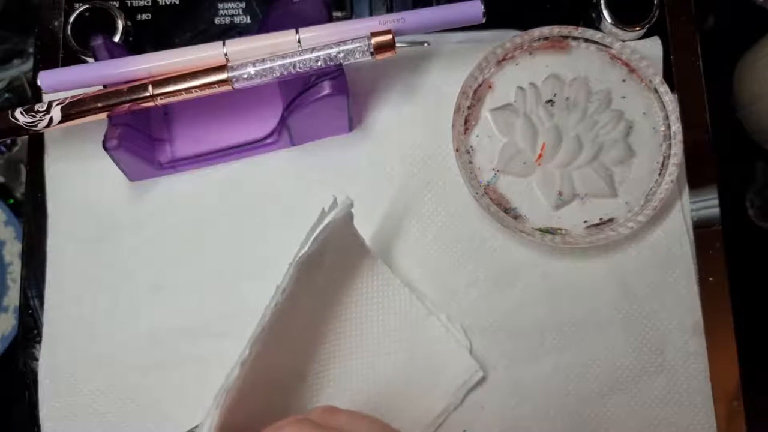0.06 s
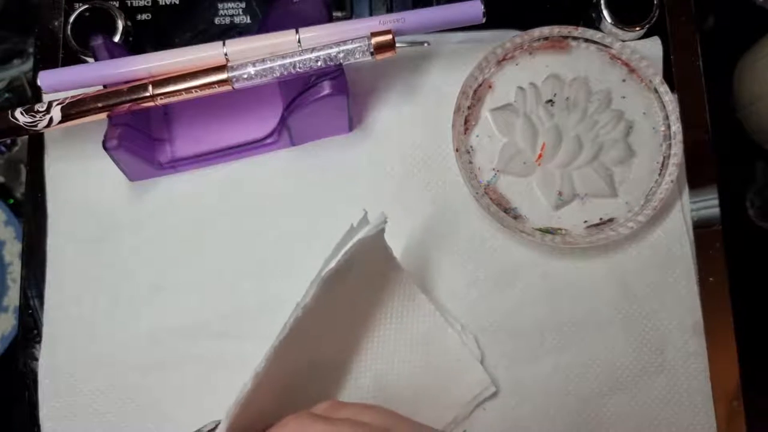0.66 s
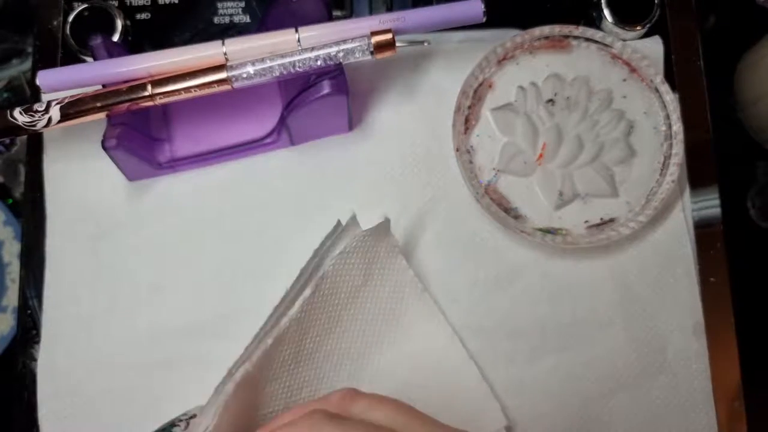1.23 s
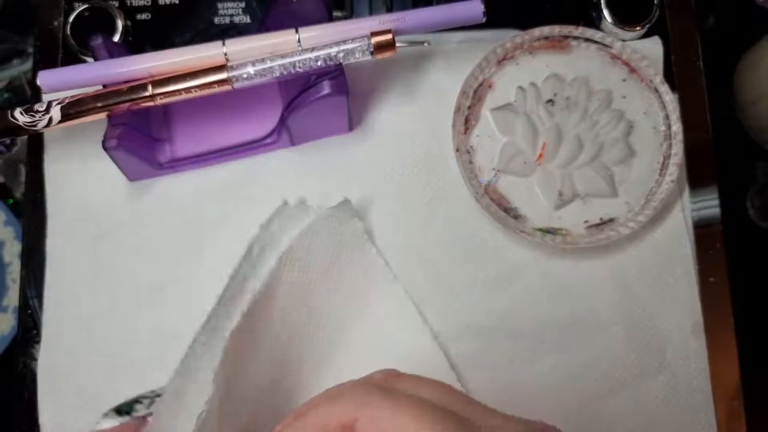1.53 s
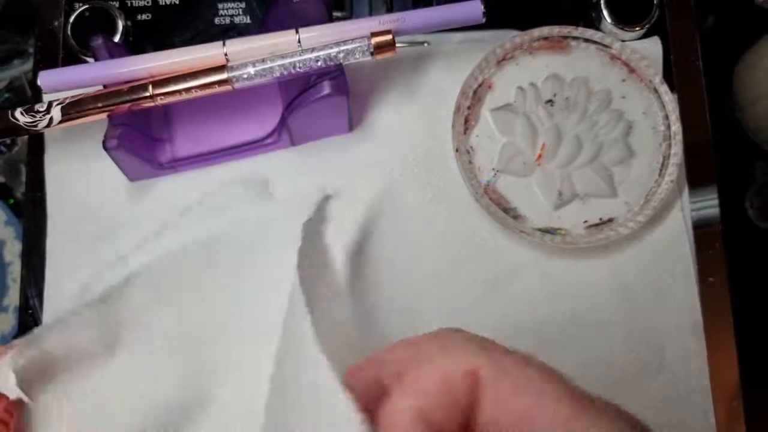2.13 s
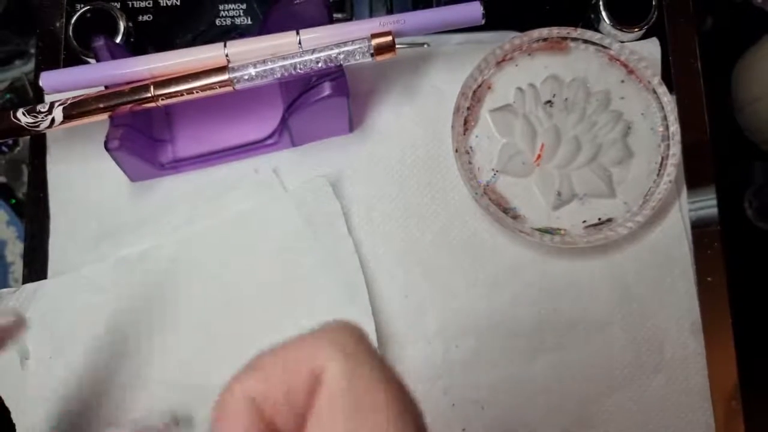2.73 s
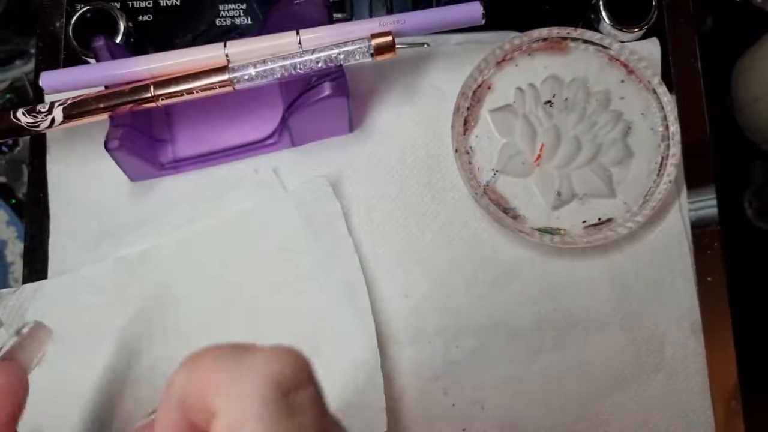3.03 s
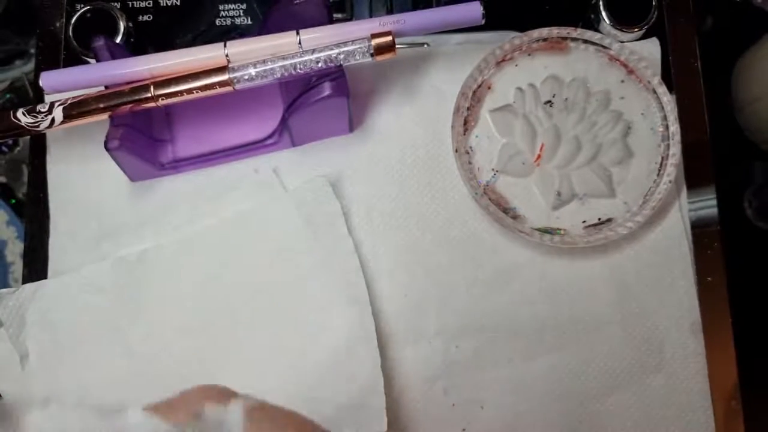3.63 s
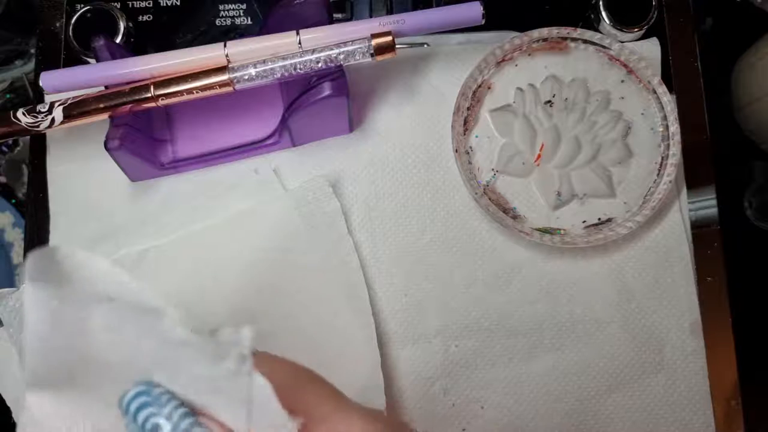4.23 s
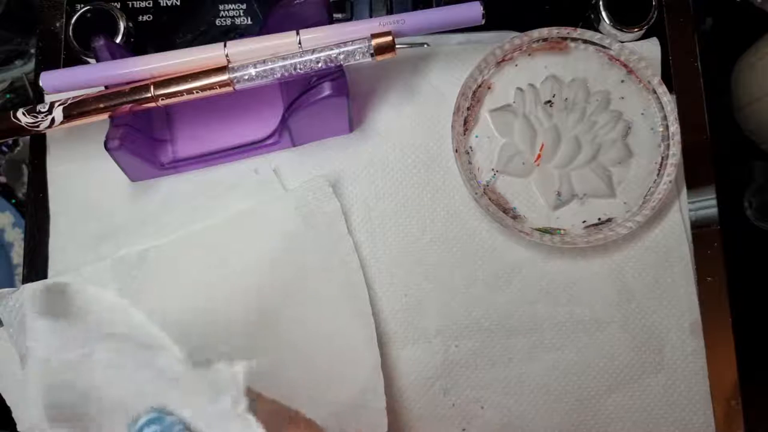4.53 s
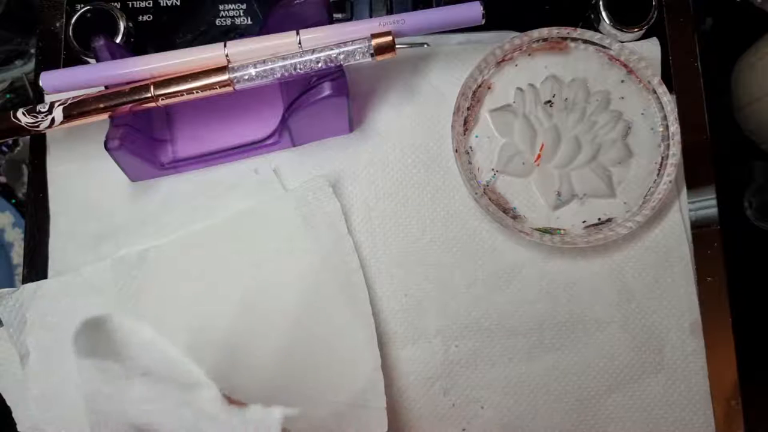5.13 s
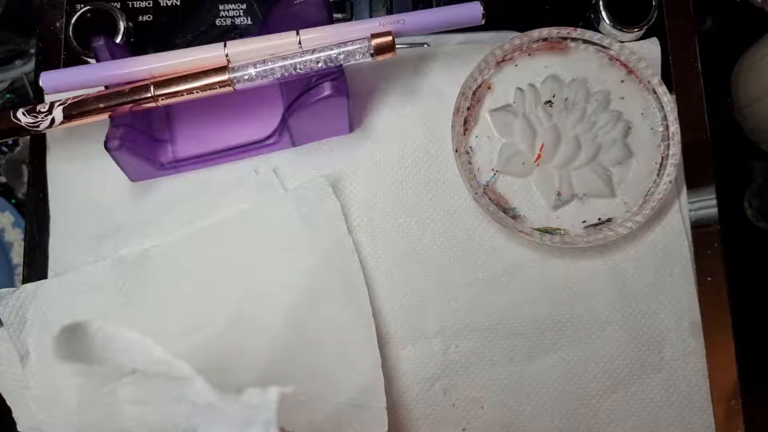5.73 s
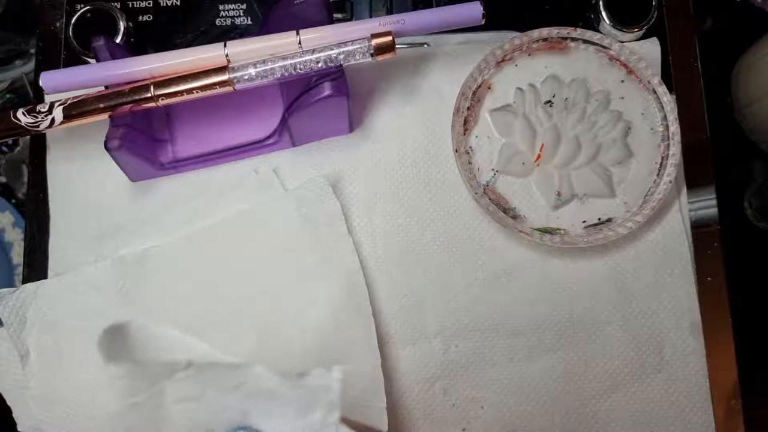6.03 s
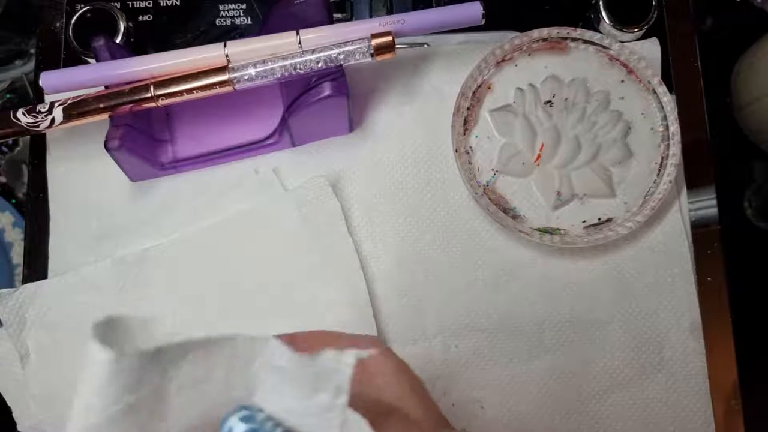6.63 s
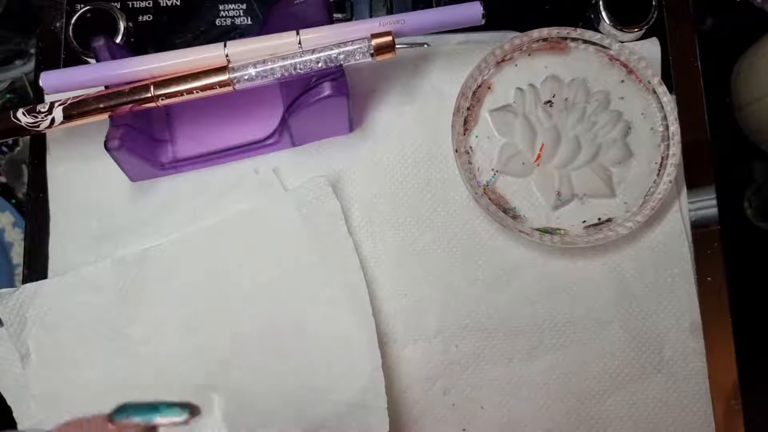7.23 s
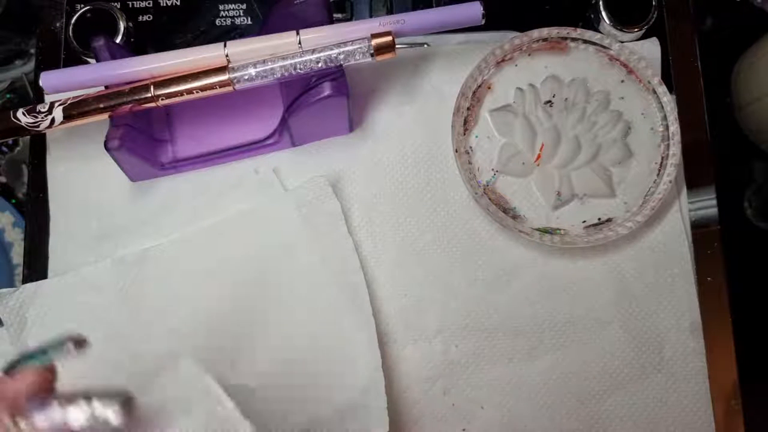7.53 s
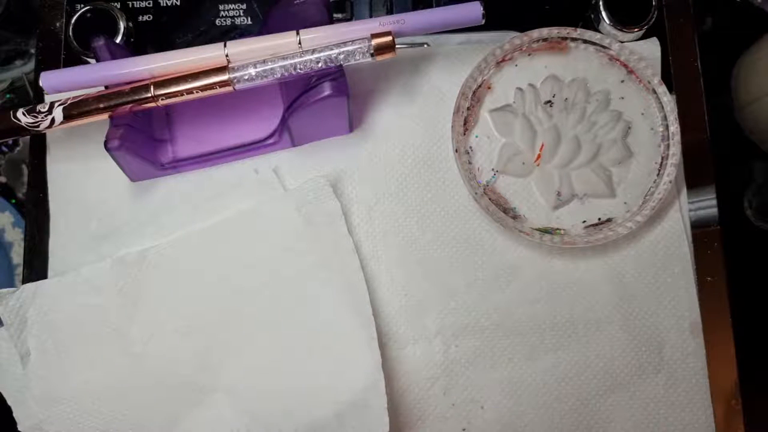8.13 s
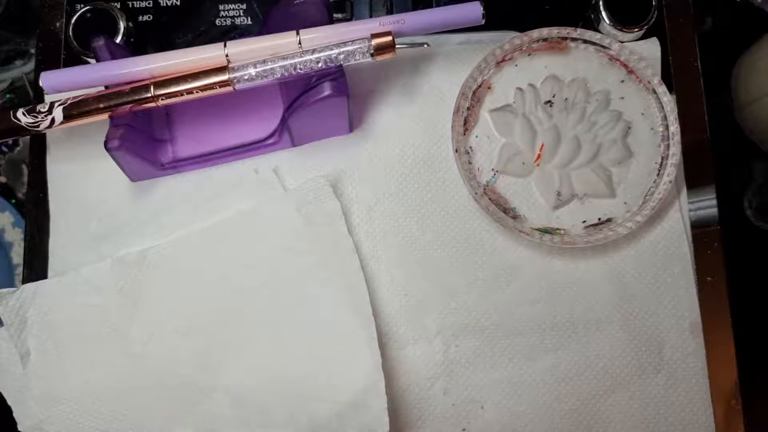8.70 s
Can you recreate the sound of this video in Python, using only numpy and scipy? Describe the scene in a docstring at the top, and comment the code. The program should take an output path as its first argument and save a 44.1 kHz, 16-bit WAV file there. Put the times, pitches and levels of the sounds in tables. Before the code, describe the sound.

Paper tissues are pulled apart and handled on a desk, with soft hissing rustles and small crease snaps. A pump bottle scrapes briefly as it is lifted, then squirts four times in quick succession with pops, hisses and sharp plastic clicks, the last one weak. It lands with a ringing thud, and the tissue is rubbed in short strokes. Everything is close, in a small quiet room with a faint fan.

```python
"""In a small quiet room with a distant fan, paper tissues are pulled apart and handled on a desk:
their fibres hiss, creases snap and hands rub dully. At 4 s a pump bottle scrapes off the desk.
From 5 s it squirts four times into the tissue, with a popping valve, hissing mist and clicking plunger.
At 6.4 s it is set down with a thud that makes desk and bottle ring.
Then the tissue is rubbed in short strokes."""
import sys
import numpy as np
from scipy import signal
from scipy.fft import rfft, irfft, next_fast_len
from scipy.io import wavfile

SR = 44100
rng = np.random.default_rng(int(sys.argv[2]) if len(sys.argv) > 2 else 0)


def inscribe(sig):
    """Save sig as 16-bit PCM at rate SR to the path in sys.argv[1].

    A 1-D sig is mono; a 2-D sig holds one channel per row.
    Samples are clipped to [-1, 1] before scaling.
    """
    pcm = np.round(np.clip(np.atleast_2d(sig).T, -1, 1) * 32767)
    wavfile.write(sys.argv[1], SR, pcm.astype(np.int16))


N = 390726
TIME = np.arange(N) / SR
SIDES = np.array([[.5], [-.5]])  # half of a left-right difference goes to each side

# pushes of the pump: (time [s], length [s], mist level [dB], valve pop level [dB], valve pitch [Hz])
SQUIRTS = [(5.118, 0.062, -36, -21, 1700), (5.3931, 0.047, -34.5, -8.5, 1630),
           (5.6491, 0.033, -33, -7.5, 1554), (5.9008, 0.0039, -34, -57, 1600)]


def amp(db):
    """Turns decibels into a number to multiply by."""
    return 10 ** (np.asarray(db) / 20)


def unit(x):
    """Scales a signal to an average (rms) strength of 1."""
    return x / np.sqrt(np.mean(x ** 2) + 1e-30)


def curve_at(points, hz):
    """Looks up a value between (frequency, value) points, on a scale of octaves."""
    f, value = np.transpose(points)
    return np.interp(np.log(hz + 1), np.log(f + 1), value)


def add(mix, s, sound):
    """Mixes a sound in, starting at s seconds."""
    part = mix[:, round(s * SR):][:, :sound.shape[-1]]
    part += sound[..., :part.shape[1]]


def colour(x, db_at, size=4096):
    """Turns each frequency up or down by db_at(frequency); nothing sounds ahead of its cause."""
    log_gain = np.log(amp(db_at(abs(np.fft.fftfreq(size, 1 / SR)))))
    response = np.exp(np.conj(signal.hilbert(log_gain)))
    taps = np.fft.ifft(response).real[:size // 2]
    return signal.oaconvolve(x, taps[None], axes=1)[:, :x.shape[1]]


def stereo(x, lag_samples=10):
    """Makes two unrelated signals left and right: alike in the bass, apart in the treble, right later."""
    # how alike the two sides are: (frequency [Hz], likeness [0 to 1])
    likeness = [(30, .85), (150, 0.76), (400, 0.64), (800, 0.1), (1500, 0.28), (16000, 0.034)]
    size = next_fast_len(x.shape[1], True)
    left, other = rfft(x, size)
    same = np.clip(curve_at(likeness, np.fft.rfftfreq(size, 1 / SR)), -1, 1)
    right = irfft(same * left + np.sqrt(1 - same ** 2) * other, size)[:x.shape[1]]
    return np.array([x[0], np.roll(right, lag_samples)])


def shaped_noise(spectrum, samples, filter_size=4096):
    """Stereo noise of strength 1 with the given balance of low and high."""
    white = stereo(rng.standard_normal((2, samples)))
    return unit(colour(white, lambda f: curve_at(spectrum, f), filter_size))


def wander(per_s):
    """A random drift of strength 1 that takes a new direction per_s times a second."""
    turns = np.arange(0, N / SR + 1, 1 / per_s)
    return unit(np.interp(TIME, turns, rng.standard_normal(8192)[:len(turns)]))


def ring(hz, t60, t):
    """A dying tone; t60 is its ring time, the seconds it takes to fade by 60 dB."""
    return np.sin(2 * np.pi * hz * t) * np.exp(-np.log(1000) * t / t60)


def hump(f, hz, octaves):
    """A broad hill of loudness around the frequency hz, in dB."""
    return -12 * np.log2(1 + (np.log2((f + 20) / hz) / octaves) ** 2 / 2)


def crack(decay_s, scatter, size=3000):
    """A sharp pulse, later on the right, with a quick scatter of noise behind it."""
    x = scatter * rng.standard_normal((2, size)) * np.exp(-np.arange(size) / SR / decay_s)
    x[0, 0] += 1
    x[1, 12] += .6
    return x


def gesture(length, rise_s, release_s):
    """One movement of a hand: a smooth start, a hold, and a fade."""
    t = np.arange(0, length + 10 * release_s, 1 / SR)
    rise = np.sin(np.pi / 2 * np.minimum(t / rise_s, 1)) ** 2
    return rise * np.exp(-np.maximum(t - length, 0) / release_s)


def from_left(x):
    """The camera shades the right microphone from treble that comes from the left."""
    # the shading: (frequency [Hz], left louder than right [dB])
    shade = [(100, 1), (700, 1), (2500, 1), (6000, 3), (9000, 7.5), (14000, 5.5)]
    left = colour(x[:1], lambda f: curve_at(shade, f) / 2)
    right = colour(x[1:], lambda f: -curve_at(shade, f) / 2)
    return np.vstack([left, right])


def room(x, early_db, tail_db, early_s=0.0086, size=26000):
    """Adds quick echoes from the desk and its clutter, then the room's short tail."""
    # how long the room rings: (frequency [Hz], ring time [s])
    ring_times = [(100, 0.75), (300, 0.37), (1000, 0.29), (4000, 0.24), (9000, 0.14), (16000, 0.16)]
    bounces = rng.standard_normal((2, size)) * (rng.random((2, size)) < .15) * (np.arange(size) > 60)
    early = bounces * np.exp(-np.arange(size) / SR / early_s)
    hz, t, bands = signal.stft(stereo(bounces * rng.choice([-1, 1], size)), SR, nperseg=256)
    fade = np.exp(-np.log(1000) * t / curve_at(ring_times, hz)[:, None])
    tail = signal.istft(bands * fade, SR, nperseg=256)[1][:, :size]
    echo = (amp(early_db) * unit(early) + amp(tail_db) * unit(tail)) / np.sqrt(size)
    return x + signal.fftconvolve(x, echo, axes=1)[:, :N]


def room_tone(air_db=-63.5):
    """Steady low rumble and hiss with the faint wavering tones of a distant fan."""
    # the room's rumble and hiss: (frequency [Hz], relative level [dB])
    air_spectrum = [(15, -34.5), (25, -14), (40, -8), (57, -3), (108, -10), (130, -22.5), (190, -22.5),
                    (249, -33), (285, -27), (531, -28.5), (818, -42), (2350, -47), (3340, -47), (4140, -44),
                    (13600, -43.5), (16000, -49)]
    # the fan's tones: (pitch [Hz], level [dB])
    fan_tones = [(57, -76), (116, -78.5), (460, -88.5), (500, -86), (537, -88.5)]
    air = shaped_noise(air_spectrum, N, filter_size=16384)
    fan = sum(amp(db) * np.sqrt(2) * np.sin(2 * np.pi * hz * TIME + wander(4.8)) for hz, db in fan_tones)
    return air * amp(air_db) + fan


def desk_hums():
    """Low desk tones swell and fade, some as the boom around the bottle's lift and set-down."""
    # low desk tones: (time [s], length [s], level [dB], pitch [Hz])
    hums = [(3.795, 0.032, -47, 151), (4.054, 0.059, -32.5, 206), (4.07, 0.096, -43.5, 129),
            (6.075, 0.055, -54, 213), (6.518, 0.33, -57, 59.5), (6.65, 0.18, -55.5, 149.4)]
    out = np.zeros((2, N))
    for s, length, db, hz in hums:
        t = np.arange(0, length, 1 / SR)
        add(out, s, amp(db) * np.sin(np.pi * t / length) * np.sin(2 * np.pi * hz * t))
    return out


def hands(tissue_body, stroke_db=-9, lumpy_db=4.0, rise_s=0.058, release_s=0.07):
    """Dull, uneven rubbing of hands on the padded desk: a little with each stroke, more in a drag."""
    # the heel of a hand dragging: (time [s], length [s], level [dB])
    drags = [(1.44, 0.035, -65.5), (2.598, 0.038, -60.5), (2.69, 0.062, -63.5), (2.83, 0.053, -64),
             (3.58, 0.058, -56), (3.76, 0.063, -59.5), (3.988, 0.039, -60), (5.23, 0.037, -59),
             (6.04, 0.055, -64), (6.59, 0.22, -64), (6.938, 0.043, -62), (7.193, 0.16, -69)]
    # the dull rub: (frequency [Hz], relative level [dB])
    rub_spectrum = [(60, -28.5), (110, 6), (160, -7.5), (300, -1.5), (450, -3), (650, -17.5), (1000, -33.5)]
    pressure = tissue_body * amp(stroke_db)
    for s, length, db in drags:
        add(pressure, s, amp(db) * gesture(length, rise_s, release_s))
    return shaped_noise(rub_spectrum, N) * pressure * amp(lumpy_db * wander(50))


def sliding(rise_s=0.052, release_s=0.036, shift_body_db=-3.5, shift_fizz_db=-4, shift_left_db=0.3):
    """How loudly the tissue slides in its body (low), middle and fizz (high): strokes plus shifting."""
    # tissue sliding on tissue: (time [s], length [s], middle level [dB], body against middle [dB],
    # fizz against middle [dB], left louder than right [dB])
    strokes = [(0.343, 0.1, -77.5, -15, -4, 0), (0.597, 0.046, -70.5, -2, -2, -2),
               (0.675, 0.048, -78.5, 5, 3, -7), (0.984, 0.14, -75.5, -10, 0, 0),
               (1.137, 0.066, -71.5, -5, 3, 0), (1.226, 0.031, -68, -2.5, 4, -1),
               (1.324, 0.12, -68, -4.5, -2, -1), (1.606, 0.034, -66.5, -2, -2, 0),
               (1.843, 0.076, -58, -3.5, -5, 0.5), (1.92, 0.083, -64, -7, -4, -1),
               (2.209, 0.165, -63.5, -6, -7, 0.5), (2.451, 0.056, -57.5, -8.5, -7, 0.5),
               (2.615, 0.084, -59.5, -2, 0, 1), (2.692, 0.061, -68.5, 2.5, 0, 6),
               (2.807, 0.096, -57.5, -7, -6.5, 1.5), (2.985, 0.047, -62.5, -7.5, -5.5, 4.5),
               (3.109, 0.13, -57.5, -5, -6, 5.5), (3.287, 0.051, -62, -31, -0.5, 2),
               (3.396, 0.047, -54.5, -12.5, 0, 2), (3.543, 0.064, -57.5, -4.5, -4.5, 2),
               (3.602, 0.045, -49, -2.5, -2.5, 2.5), (3.75, 0.11, -56.5, -9.5, -1.5, 3.5),
               (3.849, 0.087, -64.5, -6.5, -1.5, 4), (4.304, 0.13, -90, -19, 13, 6.5),
               (4.453, 0.071, -70.0, -12, -2, 5), (6.681, 0.078, -72.5, -3.5, -2.5, 2.5),
               (6.822, 0.048, -75.5, -21, -1, 1), (6.945, 0.057, -56.5, -6, -3, 2.5),
               (7.016, 0.13, -63, -7.5, -4.5, 2.5), (7.185, 0.069, -51, -7.5, 0, 2),
               (7.268, 0.1, -51.5, -5, -1.5, -0.5), (7.389, 0.061, -47, -9.5, -1.5, 1),
               (7.468, 0.041, -56.5, -3.5, -1, 3), (7.566, 0.054, -49, -11, -3.5, 2.5),
               (7.632, 0.082, -58, -5, -2.5, 3), (7.761, 0.11, -58.5, -4, -3, 1.5),
               (7.944, 0.054, -55.5, -6.5, -4.5, 0.5), (8.046, 0.04, -49, -8, -5, 1),
               (8.137, 0.063, -58, -11, -3.5, 0.5), (8.251, 0.068, -55, -10.5, -5, 1),
               (8.34, 0.092, -59.0, -12.5, -3.5, 0), (8.551, 0.11, -72.5, -20.5, 3.5, -2.5),
               (8.834, 0.04, -59, -11.5, 2, 0)]
    # the sheet shifting faintly, almost still while the bottle sprays: (time [s], level [dB])
    shifting = [(0, -72), (0.27, -87), (0.55, -87.5), (0.62, -71), (0.95, -77.5), (1.75, -77.5),
                (2.58, -72), (2.8, -66), (2.97, -72.5), (4, -72), (4.3, -83.5), (4.85, -83.5), (4.97, -100),
                (6.65, -93), (7.15, -74), (7.55, -63), (7.93, -104), (8.8, -75)]
    shift = amp(np.interp(TIME, *np.transpose(shifting)) + shift_left_db * SIDES)
    power = [(shift * amp(band_db)) ** 2 for band_db in (shift_body_db, 0, shift_fizz_db)]
    for s, length, db, body_db, fizz_db, left_db in strokes:
        stroke = gesture(length, rise_s, release_s) * amp(db + left_db * SIDES)
        for band, band_db in zip(power, (body_db, 0, fizz_db)):
            add(band, s, (stroke * amp(band_db)) ** 2)
    return np.sqrt(power)


def crinkles(per_s=30, size_db=5.0, spread_db=3, decay_s=0.0018):
    """Small creases give way at random, each a very short burst of noise."""
    sizes = amp(size_db + spread_db * np.minimum(rng.exponential(1, N), 2))
    kicks = sizes * (rng.random(N) < per_s / SR)
    bursts = signal.lfilter([1], [1, -np.exp(-1 / SR / decay_s)], kicks)
    return bursts * rng.standard_normal((2, N))


def folds(x, depth_db):
    """The sheet's folds keep changing shape, so patches of its sound grow louder and softer."""
    bands = signal.stft(x, nperseg=512)[2]
    blur = np.outer(np.hanning(11), np.hanning(35))  # across frequency and time
    patches = signal.oaconvolve(rng.standard_normal(bands.shape[1:]), blur, "same")
    return signal.istft(bands * amp(depth_db * unit(patches)), nperseg=512)[1][:, :N]


def tissue(slide, grain_db=2.0, grains_per_s=4500, hiss_gain=1.05, flutter_db=1.57, fizz_left_db=3):
    """Fibres catch and let go in thousands of tiny grains of sound over a smooth sliding hiss."""
    # the paper's rustle: (frequency [Hz], relative level [dB])
    paper_spectrum = [(290, -22.5), (500, -5), (650, -4.5), (900, -2.5), (1200, -1), (1550, -4), (2000, -2),
                      (3700, 2.5), (4940, -1), (6060, -4.5), (7310, -6.5), (8210, -4.5), (10100, -11),
                      (15100, -13), (16000, -8.5)]
    sizes = amp(grain_db * np.minimum(rng.exponential(1, N), 5))
    catches = sizes * (rng.random(N) < grains_per_s / SR)
    grains = unit(catches * rng.standard_normal((2, N)))
    friction = stereo(grains + hiss_gain * rng.standard_normal((2, N)) + crinkles())
    sheet = folds(colour(friction, lambda f: curve_at(paper_spectrum, f)), depth_db=2.4)
    body, middle, fizz = slide
    fizz = fizz * amp(fizz_left_db * SIDES)
    out = np.zeros((2, N))
    for edges_hz, level in [((600, 2200), body), ((2200, 7000), middle), ((7000, 16500), fizz)]:
        band = signal.sosfilt(signal.butter(3, edges_hz, "band", fs=SR, output="sos"), sheet)
        out += band / band.mean(0).std() * level
    return out * amp(flutter_db * wander(90))


def crease_snaps():
    """Single creases give way and fingernails tick."""
    # snaps and ticks: (time [s], peak level [dB], centre [Hz], width [octaves])
    snaps = [(0.3584, -44.5, 9000, 0.95), (.592, -41.5, 6960, 4), (0.647, -45.5, 1790, 1.5),
             (0.977, -42, 8000, 0.74), (1.264, -44, 5000, 0.9), (1.905, -30.5, 1980, 1.4),
             (2.627, -30.5, 3340, 1.5), (2.645, -32.5, 1610, 0.89), (2.657, -35, 1370, 0.97),
             (2.720, -43, 750, 1), (2.750, -34, 900, 2.3), (2.841, -30.5, 2960, 3.2),
             (3.317, -31, 11300, 1.05), (3.603, -28.5, 11000, 0.38), (3.692, -36, 600, 1.34),
             (4.0547, -28.5, 8960, 2), (7.218, -31, 4960, 1.5), (7.527, -34, 5020, 0.87),
             (7.603, -29, 3450, 1.6), (7.726, -37, 4000, 0.62), (7.987, -37, 594, 1.7)]
    out = np.zeros((2, N))
    for s, db, hz, octaves in snaps:
        snap = colour(crack(decay_s=0.00096, scatter=0.87), lambda f: hump(f, hz, octaves))
        add(out, s, amp(db) * snap / abs(snap).max())
    return out


def desk_ring(move, t, length, lag_s=0.00013):
    """The desk's own tones build up during a scrape and ring on; move is 0 (lift) or 1 (set down)."""
    # the desk's tones: (pitch [Hz], ring time [s], level on lifting [dB], level on setting down [dB])
    desk_tones = [(55, 0.38, -27, -14), (123.3, 0.087, -6.5, -8.5), (149.4, 0.35, -3.5, 2.5),
                  (178, 0.51, -35, -2), (209, 0.031, 3, -3.5), (281, 0.13, -10, -2),
                  (302.2, 0.22, -5.5, -6), (395.3, 0.28, -4, -12), (427.5, 0.1, -7.5, 0),
                  (453, 0.09, -19, -8), (605, 0.0807, -14, -21), (696.6, 0.085, -1.5, -14),
                  (735, 0.11, -19, -10), (846, 0.21, -18, -16), (983, 0.12, -1.5, -10.5),
                  (1034, 0.046, 4, -7.5), (1373, 0.26, -16, -23)]
    out = np.zeros((2, len(t)))
    for hz, t60, *levels_db in desk_tones:
        damping = np.log(1000) / t60
        build_up = 1 - np.exp(-damping * np.minimum(t, length))
        fade = np.exp(-damping * np.maximum(t - length, 0))
        tone = np.sin(2 * np.pi * (hz * np.array([t, t - lag_s]) + rng.random()))
        out += amp(levels_db[move]) * unit(build_up * fade) * tone
    return out


def bottle_ring(move, t, split=0.01285, count=7):
    """The bottle's wall rings; the liquid inside splits each tone into a close, wobbling cluster."""
    # the wall's tones: (pitch [Hz], ring time [s], level on lifting [dB], level on setting down [dB])
    wall_tones = [(2300, 0.25, -4, 3.5), (2580, 0.11, -15, 5), (4250, .12, -18, -4), (5120, 0.13, 7, -2),
                  (6550, 0.25, -4, 2.5), (7542, 0.22, -20, -28), (8700, 0.18, -4, -10),
                  (10530, 0.21, -4.5, -1), (10830, 0.078, -2, -17), (12330, 0.071, -18, -26),
                  (13070, .12, -16, -36), (13570, 0.2, -4, 0)]
    out = np.zeros((2, len(t)))
    for hz, t60, *levels_db in wall_tones:
        pitches = hz * (1 + split * rng.uniform(-1.0, 1, (count, 1)))
        phases = rng.random((2, count, 1))
        cluster = np.sin(2 * np.pi * (pitches * t + phases)).sum(1) * np.exp(-np.log(1000) * t / t60)
        out += amp(levels_db[move]) * cluster / cluster.std(1, keepdims=True)
    return out


def judder(t, length, rise_s, slips_per_s, release_s=0.031, slip_depth=0.28, easing_s=0.2):
    """The base sticks and slips: a short, throbbing force that eases off."""
    pressure = np.minimum(t / rise_s, 1) * np.exp(-t / easing_s - np.maximum(t - length, 0) / release_s)
    force = rng.standard_normal((2, len(t)))
    for _ in range(3):  # make all frequencies equally strong
        force = irfft(np.exp(1j * np.angle(rfft(force * pressure))))
    return force * pressure * (1 + slip_depth * np.cos(2 * np.pi * slips_per_s * t))


def bottle_scrapes(knock_hz=320, knock_s=0.0015, ring_delay_s=.003, grip_s=0.047):
    """The base knocks and judders: it shakes the desk and sets the bottle's wall ringing."""
    # lifting, then setting down: (time [s], length [s], rise [s], scrape [dB], desk hum [dB],
    # bottle ring [dB], ring build-up [s], slips [per s], first knock [dB])
    moves = [(4.066, 0.067, 0.011, -34, -40.5, -41, 0.0045, 169.7, -36.5),
             (6.4265, 0.048, 0.00091, -25, -32, -41.5, 0.027, 310, -18)]
    # the push on the desk: (frequency [Hz], level on lifting [dB], level on setting down [dB])
    push_spectra = [(35, -23, 0.5), (60.3, -7, -1), (111.2, -8.5, -15.5), (177, -10, -6.5),
                    (300, -0.5, 7.5), (433, -3.5, 5), (534, -3, -2.5), (1050, -6.5, -12),
                    (1240, -12.5, -20), (2300, -14.5, -20), (3180, -25, -31), (4940, -22, -32.5),
                    (9040, -32.5, -42.5), (15000, -44, -46)]
    out, t = np.zeros((2, N)), np.arange(16384) / SR
    knock = t / knock_s * np.exp(1 - t / knock_s) * np.sin(2 * np.pi * knock_hz * t)
    for move, (s, length, rise, scrape_db, hum_db, ring_db, build, slips, knock_db) in enumerate(moves):
        spectrum = [(row[0], row[1 + move]) for row in push_spectra]
        scrape = colour(stereo(judder(t, length, rise, slips)), lambda f: curve_at(spectrum, f))
        grip = np.exp(-np.maximum(t - length, 0) / grip_s)  # the gripping hand damps the ring
        chime = bottle_ring(move, t) * (1 - np.exp(-t / build)) * grip
        hum = desk_ring(move, t, length)
        for delay, part, db in [(0, scrape, scrape_db), (0, hum, hum_db), (ring_delay_s, chime, ring_db)]:
            add(out, s + delay, amp(db) * part / part[:, :round(length * SR)].std())
        add(out, s, amp(knock_db) * knock)
    return out


def pump_clicks(rebound_s=0.0059, spring_db=-33, spring_hz=1750, spring_t60=0.032):
    """The plunger strikes its stop, bounces once, and leaves the spring ringing."""
    # the pump's clicks: (time [s], level [dB], centre [Hz], width [octaves], bounce against click [dB])
    clicks = [(5.272, -37, 1650, 1.2, -22), (5.288, -33.5, 6030, 2.3, -26),
              (5.341, -14.5, 4300, 1.86, -2.5), (5.543, -31.5, 1970, 3.6, -27),
              (5.557, -28, 8040, 2.6, -27), (5.5999, -15, 5730, 2, -2), (5.799, -32.5, 1670, 2.3, -11),
              (5.816, -31.5, 8000, 1.1, -27), (5.849, -14, 5500, 1.85, -5),
              (6.020, -44.5, 1260, 0.79, -16.5), (6.0417, -25.5, 9100, 2.15, -27),
              (6.077, -33.5, 2520, 1.08, -6), (6.138, -33.5, 9000, 2.4, -22.5),
              (6.336, -42.5, 8000, 0.81, -10.5)]
    # the tone of the plastic head: (frequency [Hz], boost [dB])
    head_spectrum = [(100, 16.5), (600, 6), (1000, -5), (1700, 4.5), (2800, -5), (4000, -12.5),
                     (6500, -8.5), (8200, -4), (10500, -15), (16000, -3.5)]
    out, t = np.zeros((2, N)), np.arange(3000) / SR
    spring = amp(spring_db) * ring(spring_hz, spring_t60, t)
    for s, db, hz, octaves, rebound_db in clicks:
        for delay, blow_db in [(0, db), (rebound_s, db + rebound_db)]:
            blow = crack(decay_s=0.001, scatter=0.52)
            click = colour(blow, lambda f: hump(f, hz, octaves) + curve_at(head_spectrum, f))
            add(out, s + delay, amp(blow_db) * (click / abs(click).max() + spring))
    return out


def mist(open_s=0.0016, close_s=0.0096):
    """The nozzle hisses until each push of the pump ends."""
    # the nozzle's hiss: (frequency [Hz], relative level [dB])
    mist_spectrum = [(60, -25.5), (150, -3), (270, 2.5), (400, 1), (600, -10), (800, -3.5), (1100, -4),
                     (1500, -2), (2400, -3), (4100, -0.5), (5600, -4.5), (6500, 0), (7400, -5), (8200, 1.5),
                     (9800, -5), (16000, -4)]
    out, t = np.zeros((2, N)), np.arange(8192) / SR
    for s, length, mist_db, _, _ in SQUIRTS:
        flow = np.minimum(t / open_s, 1) * np.exp(-np.maximum(t - length, 0) / close_s)
        add(out, s, amp(mist_db) * shaped_noise(mist_spectrum, len(t)) * flow)
    return out


def valve_pops(pop_s=0.00068, delay_s=0.0011, right_db=-7, thump_db=-23, tube_db=-22):
    """The valve pops open as each squirt starts; the pump tube rings briefly and the bottle thumps."""
    out, t = np.zeros((2, N)), np.arange(6000) / SR
    for s, _, _, pop_db, hz in SQUIRTS:
        phase = 2 * np.pi * hz * t
        pop = t / pop_s * np.exp(1 - t / pop_s) * (np.sin(phase) + 0.13 * np.cos(2 * phase))
        pop += amp(tube_db) * ring(hz, t60=.035, t=t)
        right = amp(right_db) * np.roll(pop, 13)  # softer and 13 samples later
        add(out, s + delay_s, amp(pop_db) * np.array([pop, right]))
        add(out, s, amp(pop_db + thump_db) * ring(hz=650, t60=0.038, t=t))
    return out


def scene():
    """Mixes the bottle on the left, the tissue, the hands and the room."""
    bottle = room(mist(), early_db=-9.5, tail_db=-14.5)
    bottle += room(valve_pops(), early_db=-8, tail_db=-22.0)
    bottle += room(pump_clicks(), early_db=-7, tail_db=-10)
    bottle += room(bottle_scrapes(), early_db=-20.5, tail_db=-16.5)
    slide = sliding()
    paper = tissue(slide) + room(crease_snaps(), early_db=-2.5, tail_db=-13.5)
    return paper + hands(tissue_body=slide[0]) + desk_hums() + from_left(bottle) + room_tone()


def record(dry, low_cut_hz=40, high_cut_hz=15900):
    """Takes away the deepest rumble and the highest treble."""
    no_rumble = signal.sosfilt(signal.butter(5, low_cut_hz, "high", fs=SR, output="sos"), dry)
    treble_cut = signal.firwin(401, high_cut_hz, window=("kaiser", 8), fs=SR)
    return signal.oaconvolve(no_rumble, treble_cut[None], "same", axes=1)


dry = scene()
out = record(dry)
inscribe(out)
```